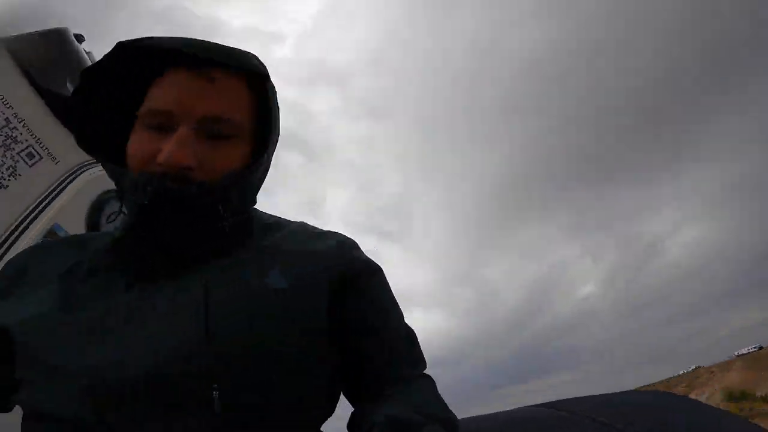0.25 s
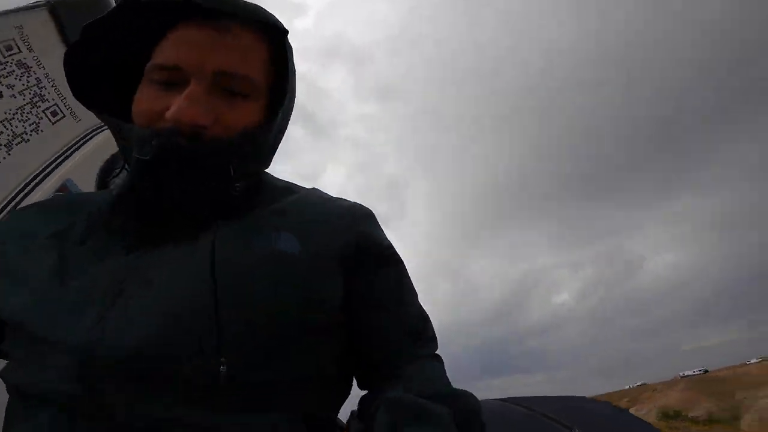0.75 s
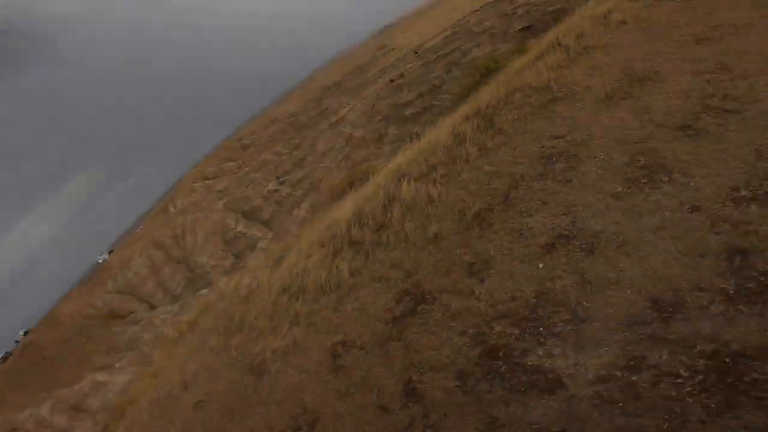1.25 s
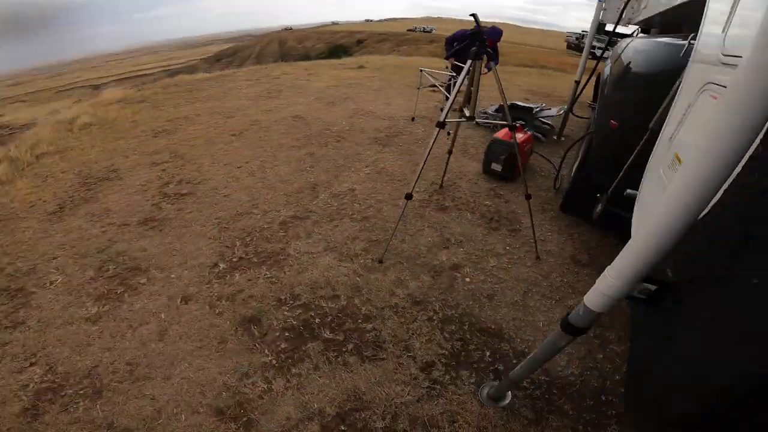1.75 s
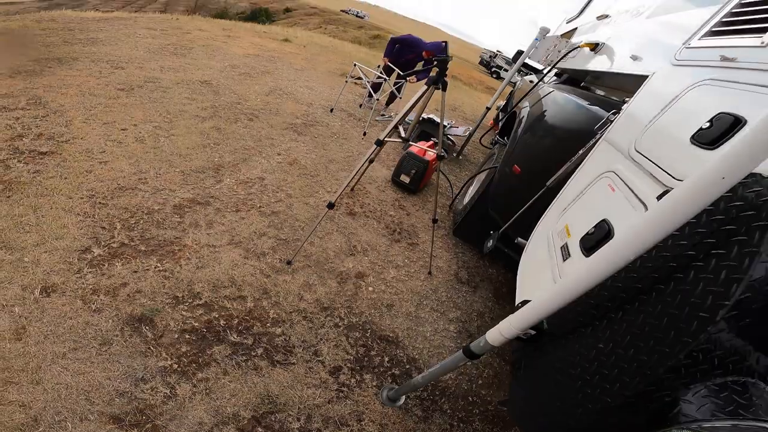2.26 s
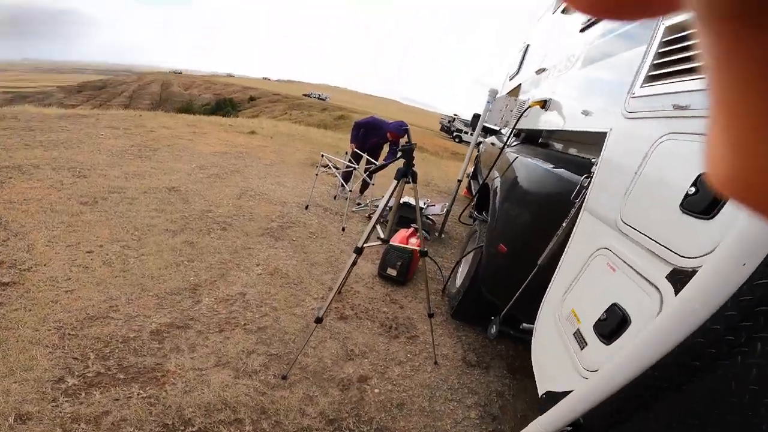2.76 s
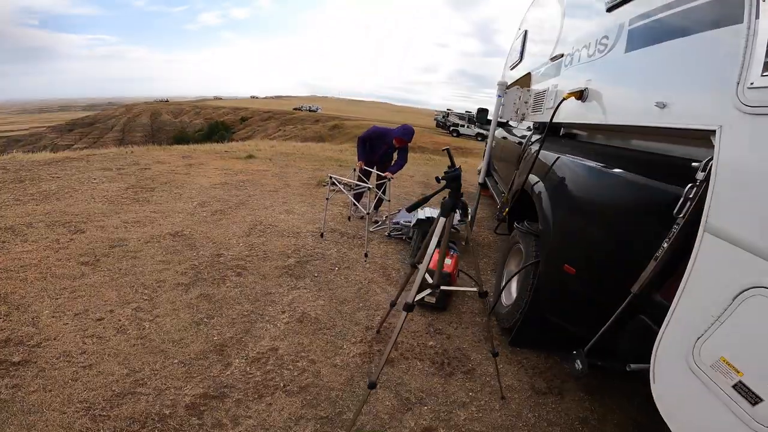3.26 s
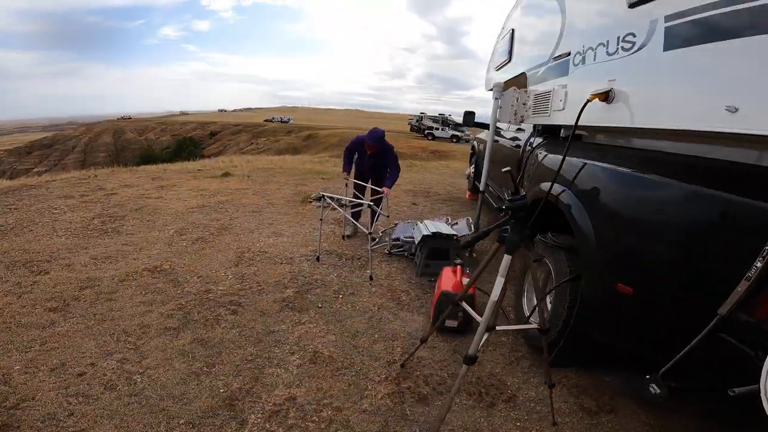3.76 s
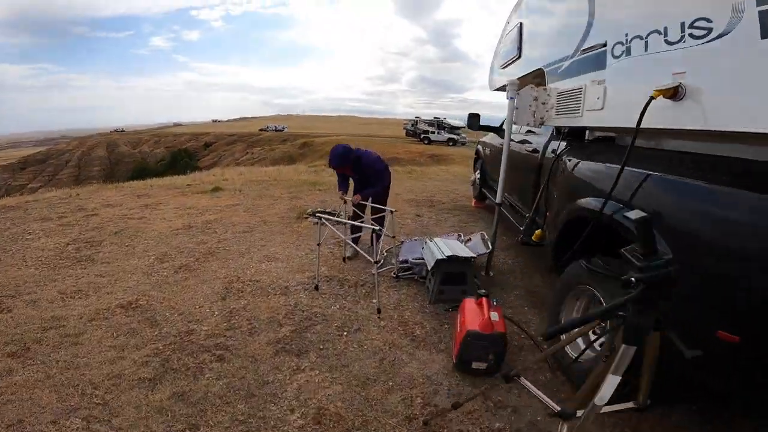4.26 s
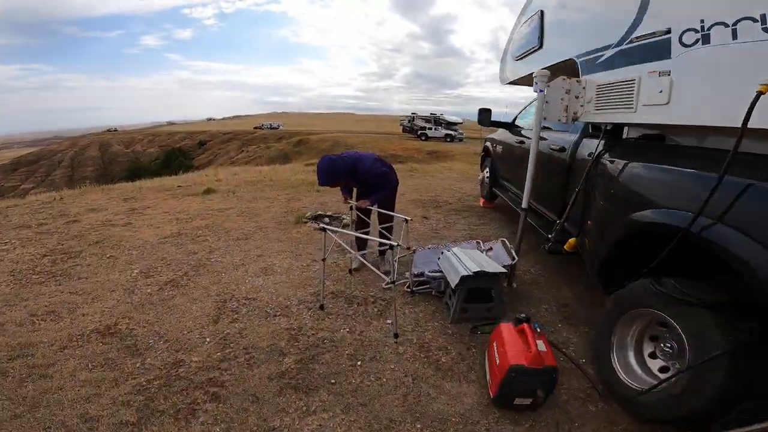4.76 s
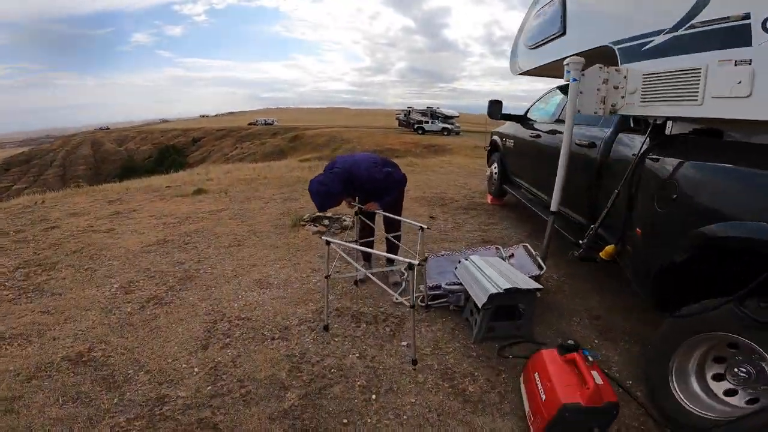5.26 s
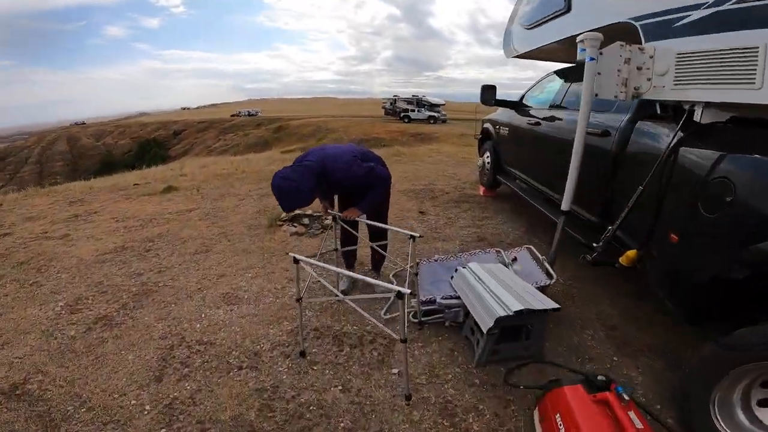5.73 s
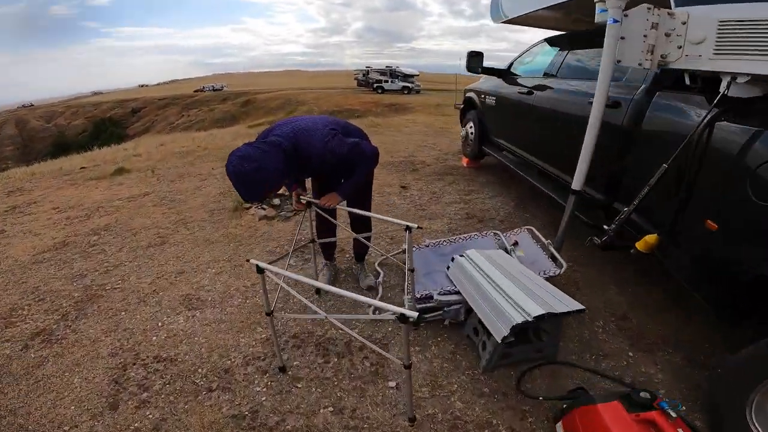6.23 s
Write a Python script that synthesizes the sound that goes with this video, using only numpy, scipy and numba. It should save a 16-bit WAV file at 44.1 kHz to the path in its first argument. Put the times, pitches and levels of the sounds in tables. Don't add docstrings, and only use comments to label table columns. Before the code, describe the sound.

Wind buffets and slaps a hand-held microphone on open grassland, then drops away as a small portable generator's rapid, rattling chug comes forward.

```python
import sys
import numpy as np
from scipy import signal
from scipy.fft import irfft
from scipy.io import wavfile
from scipy.ndimage import uniform_filter1d
from numba import njit

SR = 44100
rng = np.random.default_rng(int(sys.argv[2]) if len(sys.argv) > 2 else 0)


def file_out(sig):
    cols = np.atleast_2d(sig).T
    lim = np.clip(cols, -1, 1)
    pcm = np.round(lim * 32767).astype(np.int16)
    wavfile.write(sys.argv[1], SR, pcm)


def ratio_of_db(decibels):
    return 10 ** (np.asarray(decibels, float) / 20)


N = 286209

FIRING_HZ = 27.45
# t/s, nearness/dB, valve side facing/dB
APPROACH = [(0, -44, 0), (.45, -45, -2), (.75, -52, 1), (1.1, -52.5, 3), (1.45, -47, -2.5),
            (1.8, -41.5, 3.5), (2.2, -46.5, 0.5), (2.6, -44, -1), (3.05, -42.5, -2.5), (3.5, -41, 1.5),
            (3.9, -34.5, -2.5), (4.35, -38, -2), (4.65, -34, -6), (4.95, -29, -6.5), (5.4, -29.5, -6),
            (5.85, -28, -5.5), (6.15, -28, -6), (6.49, -27, -8)]
# t/s, lead/cycles
ARRIVAL_LEAD = [(0, 0.21), (.7, 0.2), (1.6, 0.2), (2.4, 0.18), (2.9, 0.19), (3.4, 0.14), (4.05, 0.17),
                (4.6, 0.095), (5.25, 0.1337), (5.85, 0.11), (6.3, 0.11), (6.49, 0.087)]
TAILPIPE_THUMPS = [
    (.18, .95),
    (.52, .8),
    (.8, .35),
]
# multiple of the firing rate, level/dB
MUFFLER_TONES = [(1, -62.5), (2, -54), (3, -44), (4, -30.5), (5, -8), (6, -10.5), (7, -4.5), (8, 1),
                 (9, 2.5), (10, -3.5), (11, -1), (12, -6), (13, -4.5), (14, -2.5), (15, -3), (16, -5),
                 (17, -22), (18, -5.5), (19, -13.5), (20, -31), (21, -8), (22, -18.5)]
# multiple of the firing rate, level/dB
PANEL_TONES = [(27, -11), (28, -10), (29, -7.5), (30, -10), (31, -10), (32, -10.5), (33, -1.5), (35, -9.5),
               (36, -9.5), (37, -8.5), (38, -5.5), (39, -5.5), (40, -10.5), (41, -4.5), (42, -19),
               (48, -11), (57, -19), (58, -12)]
# f/Hz, width/Hz, level/dB
CASING_MODES = [(442, 200, -19), (777, 110, -6.5), (925, 80, -1), (1072, 150, -1), (1373, 390, -6)]
# f/Hz, width/Hz, level/dB
PANEL_MODES = [(1597, 107, 0), (1820, 450, -9.5), (2303, 290, -7), (2458, 71, 0.5), (2700, 680, -5.5)]
# f/Hz, width/Hz, trim/dB
VALVE_MODES = [(3688, 210, -0.11), (4068, 130, -.1), (4386, 240, -.1), (4750, 220, -0.11),
               (5575, 200, -0.11), (6760, 320, -.1), (7470, 120, -.1)]
VALVE_LEVELS = [-14.5, -14.5, -21.5, -18, -24, -29.5, -30.5]
# t/s, half length/s, f/Hz, lift/dB
VALVE_BEAMS = [(.03, 0.16, 5500, 11), (0.39, 0.18, 4210, 16.5), (0.93, 0.21, 4070, 12),
               (1.434, 0.041, 4050, 13), (1.72, 0.12, 4200, 19.5), (1.78, 0.045, 4670, 16.5),
               (2.1, 0.047, 3900, 12), (2.11, 0.1, 4050, 9), (2.5, 0.04, 3000, 13), (3.17, 0.45, 4050, 11),
               (3.58, 0.42, 3600, 10), (3.8, 0.13, 4050, 10.5), (3.9, 0.024, 3820, 12),
               (4.55, 0.21, 4070, 10.5), (4.57, 0.43, 4600, 13.5), (2.8, 0.025, 4100, 7),
               (5.37, 0.058, 5630, 13.5), (6.5, 0.17, 4670, -24), (5.677, 0.091, 3840, 18.5),
               (6.4, 0.037, 4100, 5), (5.96, 0.065, 3650, 13.5), (6.314, 0.44, 4030, 13),
               (5.08, 0.25, 5530, 7.5), (4.9, 0.13, 3500, 4), (4.95, 0.23, 3800, 9.5),
               (2.54, 0.82, 5550, 9.5), (6.1, 0.13, 4000, 5), (0.33, 0.11, 5430, 14),
               (5.07, 0.16, 7500, 6.5), (4.1, .12, 7560, 12), (5.3, 0.1, 4470, 8), (5.7, .12, 7100, 4),
               (2.4, .12, 6700, 10), (3.05, .06, 4000, 5), (4.9, .15, 11000, 10), (5.72, 0.089, 7560, 4),
               (5.35, 0.22, 7560, 7.5), (3.4, 0.27, 6700, 13), (2.8, .08, 6100, 12),
               (3.58, 0.18, 5600, 6.5), (5.95, 0.13, 4050, 1.5), (6.9, 0.083, 4050, 5), (2.3, .15, 7360, 3),
               (6.25, 0.09, 5900, 8), (4.45, 0.18, 3700, 8), (4.78, .08, 4450, 8), (4.93, 0.044, 5100, 5.5),
               (4.6, .2, 5600, 10.5), (1.91, .06, 4700, 13), (4.76, .07, 4000, 7)]
# f/Hz, width/Hz, level/dB
FAN_SLOTS = [(3380, 560, 6.5), (4330, 1220, 10), (5510, 880, -1), (6770, 750, -3), (7580, 600, -5),
             (8490, 760, -10), (9320, 1000, -16), (10530, 1100, -22.5)]
# t/s, half length/s, f/Hz, lift/dB
LOBE_FLARES = [(.1, 0.22, 5850, 13), (1.299, 0.21, 1150, -4), (2.8, 0.19, 1540, 11.5),
               (2.7, 0.45, 7200, 8.5), (3.4, 0.26, 4300, 1.5), (3.53, 0.38, 2260, 10), (3.6, .25, 6000, 0),
               (4.3, 0.13, 4700, 0.5), (5.4, 0.46, 8000, 15), (1.6, .13, 1400, 11), (4.7, 0.17, 7500, 9),
               (6.3, .12, 1150, 2), (6.4, 0.2, 1040, 2.5), (6.28, 0.21, 6800, -3.5),
               (6.41, 0.36, 1330, -13), (1.1, 1.6, 7400, -5), (5.5, 0.65, 8000, -7.5),
               (2.1, .3, 6600, -0.5), (4.2, .25, 7400, -3.5), (2.3, 0.25, 1600, 5), (1.82, .1, 2600, 5.5),
               (3.4, 0.17, 950, 8), (2.9, .4, 5000, 4), (4.85, 0.32, 4350, 5), (5.4, 0.72, 1580, 3.5),
               (5.7, .2, 6200, 1), (5.4, .5, 10000, 4), (5.9, 0.18, 930, -1.5), (6.2, 0.27, 750, 2.5),
               (3.2, 0.22, 2250, -2), (4.1, .3, 9500, -5.5), (6.2, .35, 7500, 3.5), (4.75, .15, 6630, -5.5),
               (5.97, 0.12, 1030, 5), (4.7, 0.32, 400, -7.5), (6.2, 0.39, 400, 2), (6.2, 0.41, 260, -3),
               (.75, .02, 7500, -10), (6.4, .1, 560, 3), (.3, .4, 9000, -4), (1.4, .2, 750, -4),
               (4.3, 0.22, 830, 4.5), (4.9, .5, 10000, 2.5), (6.2, .4, 1100, -3.5), (5.3, .3, 560, -4.5),
               (6.2, .35, 1200, -2.5), (5.3, 0.13, 1400, -3.5)]
# t/s, length/s, buffet level/dB, brightness/dB
PORT_GUSTS = [(0.079, 0.089, -25, -14), (0.224, 0.16, -21, -14), (0.386, 0.15, -19, -15.5),
              (0.557, 0.13, -20, -29), (0.692, 0.087, -19.5, -17.5), (0.807, 0.042, -22.5, -17),
              (0.866, 0.033, -24, -12), (0.944, 0.11, -21.5, -19.5), (1.208, 0.024, -28, -10),
              (1.522, 0.023, -20, -16), (1.561, 0.053, -27, -16), (1.679, 0.2, -30.5, -8),
              (1.819, 0.085, -23, -26), (2.448, 0.036, -21.5, -5.5), (1.938, 0.17, -20, -15.5),
              (2.121, 0.069, -20.5, -12), (2.195, 0.012, -19, -8), (2.228, 0.26, -21, -17.5),
              (2.526, 0.054, -22, -11), (2.646, 0.086, -21.5, -12), (2.72, 0.28, -21, -6.5),
              (3.018, 0.08, -25.5, -19), (3.142, 0.15, -27.5, -40), (3.362, 0.21, -32.5, -25),
              (3.654, 0.1, -26.5, -10), (0.998, 0.021, -23, 0.5), (3.913, 0.12, -25, -19),
              (4.065, 0.068, -20.5, -7), (4.152, 0.061, -21.5, -15.5), (4.227, 0.079, -30.5, -7.5),
              (0, 0.042, -31, -26), (0.583, 0.012, -29, -7), (0.62, 0.012, -26, -13),
              (1.02, 0.032, -28.5, -13), (1.063, 0.038, -21.5, -12), (1.971, 0.032, -25.5, 0.5),
              (2.053, 0.011, -28, -8), (2.25, 0.015, -28, -3), (2.393, .05, -25.5, -9),
              (2.496, 0.022, -26.5, -2), (2.75, 0.038, -24, -1), (2.842, 0.016, -30, -11),
              (2.92, 0.031, -26, 1), (3.53, 0.047, -28, -17), (3.963, 0.053, -23, -5.5),
              (4.103, 0.027, -26.5, -9), (4.175, 0.016, -23, -2.5), (3.266, 0.07, -39, -23),
              (1.258, .012, -35, -16), (3.305, 0.023, -29, -22)]
# t/s, level/dB
LEE_STIR = [(4.4, -60), (4.7, -46), (4.9, -37.5), (5.15, -38.5), (5.35, -32.5), (5.5, -32.5), (5.7, -31),
            (5.86, -29), (5.95, -39), (6.25, -32), (6.49, -35)]
# f/Hz, width/Hz, level/dB
EDDY_MODES = [(168.4, 143, -14.5), (250, 105, -0.5), (359, 163, 1), (548, 274, -4), (770, 303, -9)]
# f/Hz, width/Hz, level/dB
RUSH_MODES = [(836, 437, 1.5), (1350, 940, -5.5), (2250, 1050, -10), (4180, 2300, -24.5)]
# t/s, peak level/dB, f/Hz, torn air/dB
SWING_SLAPS = [(0.02, -22, 527, -22), (0.044, -24, 598, -24), (0.068, -28, 250, -17),
               (0.098, -20, 277, -23), (0.171, -25, 409, -14), (0.248, -18.5, 315, -8),
               (0.279, -14.5, 395, -12), (0.329, -16, 543, -24), (0.358, -22, 398, -14),
               (0.384, -22, 232, -14), (0.426, -8, 487, -26), (0.479, -24, 394, -3), (0.537, -16, 320, -18),
               (0.603, -14, 401, -16.5), (0.631, -11, 417, -17), (0.686, -14.5, 490, -17),
               (0.712, -19, 255, -17), (0.819, -22, 460, -18), (0.885, -11.5, 517, -15.5),
               (0.94, -17.5, 519, -14.5), (0.962, -29, 353, -16), (0.98, -24, 447, -6),
               (0.994, -9, 670, -15.5), (1.06, -28, 290, -18), (1.098, -16.5, 312, -17),
               (1.143, -35, 216, -8), (1.366, -29, 207, -21), (1.522, -12, 382, -16), (1.595, -22, 272, -7),
               (1.746, -16, 320, -18)]
# t/s, peak level/dB, f/Hz, torn air/dB
STEP_SLAPS = [(1.91, -28, 315, -9), (1.924, -20, 248, -7.5), (1.956, -13, 361, -8),
              (1.981, -12.5, 320, -19), (2.016, -13, 390, -15), (2.079, -11, 475, -15.5),
              (2.136, -12.5, 272, -20), (2.246, -15, 331, -21), (2.262, -10.5, 524, -23),
              (2.273, -10, 347, -14), (2.321, -24, 304, -6.5), (2.41, -16, 270, -17),
              (2.468, -21, 310, -12), (2.533, -21, 323, -15), (2.629, -19.5, 342, -15),
              (2.642, -17, 284, -21), (2.678, -12, 730, -28), (2.705, -14, 463, -13.5),
              (2.736, -20, 280, -14), (2.777, -12, 344, -19), (2.843, -11, 546, -20),
              (3.047, -20, 339, -16), (3.178, -14.5, 420, -21), (3.217, -19, 220, -19),
              (3.369, -22, 297, -19), (3.548, -17.5, 470, -15), (3.586, -26, 427, -13),
              (3.658, -32, 304, -4), (3.677, -14, 350, -14), (3.988, -12, 424, -14), (4.069, -17, 374, -14),
              (4.175, -11, 470, -6.5), (4.256, -22, 326, -9)]
# t/s, peak level/dB, f/Hz, rush burst/dB
CASING_KNOCKS = [
    (5.162, -14, 1130, -25),
    (5.201, -10, 1130, -27),
    (5.274, -18, 1080, -25),
    (5.307, -11, 1150, -26),
    (6.08, -7, 1060, -20),
    (6.14, -12.5, 1020, -6),
]
# t/s, peak level/dB
MESH_TEARS = [(0.5945, -24), (0.6414, -35), (0.711, -33), (1.0765, -31), (1.9195, -29), (1.986, -22),
              (2.073, -21), (2.201, -26), (2.2717, -27), (2.2894, -30), (2.4683, -19), (2.504, -35),
              (2.645, -27), (2.8144, -28), (2.9753, -23), (3.9918, -17), (4.0816, -18.5), (4.1111, -20),
              (4.1805, -16.5), (4.2194, -25)]
# t/s, half length/s, level/dB
FLOW_STALLS = [(0.225, 0.0105, -6), (0.266, 0.006, -3), (0.319, 0.013, -4.5), (0.383, 0.014, -3.5),
               (0.471, 0.0051, -9), (0.547, 0.0068, -5), (0.628, 0.0046, -6), (0.657, 0.007, -3),
               (0.705, 0.0047, -8), (0.739, 0.016, -5.5), (0.8, 0.01, -2), (0.858, 0.0015, -6),
               (0.883, 0.015, -2.5), (0.934, 0.0132, -7), (0.949, 0.004, -3), (1.046, 0.0051, -1.5),
               (1.114, 0.0033, -4), (1.134, 0.0149, -5), (1.247, 0.0093, -8), (1.51, 0.0146, -5),
               (1.817, 0.0097, -3), (1.884, 0.0099, -11), (1.942, 0.0109, -2), (2.005, 0.0068, -8),
               (2.05, 0.0124, -0.5), (2.09, 0.0012, -5), (2.099, 0.0125, -6.5), (2.227, 0.013, -6.5),
               (2.238, 0.0023, 3), (2.297, 0.0048, -8), (2.335, 0.003, -10), (2.405, 0.0058, -6),
               (2.456, 0.0045, -2), (2.522, 0.0103, -4), (2.61, 0.0027, -8), (2.624, 0.004, -7),
               (2.638, 0.0029, -5), (2.698, 0.0063, -3), (2.765, 0.0036, -3.5), (2.825, 0.003, -6),
               (2.889, 0.0036, -8), (3.031, 0.0049, -4), (3.194, 0.0031, -7), (3.248, 0.0124, -8),
               (3.652, 0.014, -5), (3.903, 0.0107, -4), (3.96, 0.0063, -2), (4.008, 0.0027, -7),
               (4.04, 0.0045, -9), (4.048, 0.0098, -4), (4.167, 0.015, -2), (4.23, 0.0066, -6)]
# t/s, level/dB
STEADY_AIR = [
    (0, -36.5),
    (1.3, -38),
    (3.3, -35),
    (4.2, -35),
    (4.5, -45),
    (6.49, -43),
]
# f/Hz, width/Hz, level/dB
GRASS_MODES = [(72, 100, -3.5), (130, 225, -4.5), (250, 120, 5), (1150, 550, -12)]


def generator():
    near_db, facing_db = curves(APPROACH)
    turns = 2 + FIRING_HZ * np.arange(N) / SR + curves(ARRIVAL_LEAD)[0]
    flat_at_db = -25.5
    closer_db = near_db - flat_at_db
    tilt_db = 0.71 * np.maximum(closer_db, -10)
    shell_db = flat_at_db + 1.5 + 1.2762 * closer_db
    thump = ratio_of_db(near_db) * exhaust(turns, tilt_db)
    rattle = ratio_of_db(shell_db) * casing(turns, panel_db=4 + 0.65 * facing_db)
    chatter = ratio_of_db(near_db + facing_db) * (valves(turns) + ratio_of_db(-7) * fan(turns))
    return thump + rattle + chatter


def exhaust(turns, tilt_db):
    out = 0
    for k, db in MUFFLER_TONES:
        pulses = sum(size * np.exp(-2j * np.pi * k * at) for at, size in TAILPIPE_THUMPS)
        timing = np.angle(pulses)
        smear = .045 * (k - 9) ** 2
        level = ratio_of_db(db + tilt_db * np.log2(k / 7) + flare_db(k * FIRING_HZ) + 0.54 * walk(9.0))
        out = out + level * np.cos(2 * np.pi * k * turns + timing - smear + .05 * walk(12))
    return unit(out)


def casing(turns, panel_db):
    swell = gate(turns, .93, .1, -3.5, 1.8) + ratio_of_db(-5) * gate(turns, .6, .05, -40, 4.0)
    pattern = irfft(np.exp(2j * np.pi * rng.random(129)))
    clatter = np.interp(turns % 1, np.linspace(0, 1, len(pattern)), pattern)
    loose = body(noise() * swell, CASING_MODES, lobes=True)
    locked = body(clatter * np.sqrt(swell), CASING_MODES[1:], wander_db=1.5, lobes=True)
    panels = body(noise() * swell, PANEL_MODES, wander_db=2.14, lobes=True)
    return unit(loose + ratio_of_db(-3) * locked) + ratio_of_db(-3.5) * hum(turns) + ratio_of_db(panel_db - 4.5) * panels


def hum(turns):
    out = 0
    for k, db in PANEL_TONES:
        level = ratio_of_db(db + 1.6 * walk(5.7) + flare_db(k * FIRING_HZ))
        out = out + level * np.cos(2 * np.pi * (k * turns + rng.random()) + 0.12 * walk(8))
    return unit(out)


def valves(turns):
    out, t = 0, np.arange(N) / SR
    for db, mode in zip(VALVE_LEVELS, VALVE_MODES):
        ticks = noise() * gate(turns, .9, .11, -20, 1.4)
        beam_db = 0
        for s, half_s, hz, lift_db in VALVE_BEAMS:
            off_pitch = (hz - mode[0]) / 220
            beam_db = beam_db + lift_db * np.exp(-((t - s) / half_s) ** 2 - off_pitch ** 2)
        level = ratio_of_db(db + beam_db + .8 * walk(14))
        out = out + level * body(ticks, [mode], 1 + .006 * walk(30))
    return out


def fan(turns):
    out = 0
    for hz, width, db in FAN_SLOTS:
        rest_db = -2.5 + 0.45 * (hz / 1000 - 4)
        air = noise() * gate(turns, .91, 0.16, rest_db, 4.3)
        slot = body(air, [(hz, 1.67 * width, db)])
        slot = body(slot, [(hz, 1.55 * width, db)], 0.97, 1.4)
        out = out + ratio_of_db(db + flare_db(hz)) * np.sqrt(width) * slot
    return unit(out)


def gate(turns, at, width, rest_db, scatter_db):
    shifted = turns - at + .5
    strength = ratio_of_db(scatter_db * rng.standard_normal(400))[shifted.astype(int)]
    since = shifted % 1 - .5
    spread = np.where(since < 0, .55 * width, 1.4 * width)
    return ratio_of_db(rest_db) + strength * np.exp(-.5 * (since / spread) ** 2)


def flare_db(hz):
    t = np.arange(0, N, 64) / SR
    lift = 0
    for s, half_s, at_hz, db in LOBE_FLARES:
        off_pitch = np.log2(hz / at_hz) / 0.14
        lift = lift + db * np.exp(-((t - s) / half_s) ** 2 - off_pitch ** 2)
    return np.repeat(lift, 64)[:N]


def wind():
    buffet, bright = buffeting()
    ragged_db = 0.41 * walk(30) + 2.7 * walk(80) + 3.1 * walk(280)
    ragged_db = 4.5 * np.tanh(ragged_db / 4.5)
    low = evened(body(noise() * ratio_of_db(ragged_db), EDDY_MODES))
    rush = evened(body(noise() * ratio_of_db(1.3 * ragged_db + .8 * walk(40)), RUSH_MODES))
    chance, size = rng.random((2, N))
    snaps = (chance < 350 / SR) * ratio_of_db(-3.5 * np.log(size + .04)) * np.sign(noise())
    crackle = ratio_of_db(-6) * body(snaps, RUSH_MODES)
    thuds = ratio_of_db(-8) * body(snaps * (chance < 110 / SR), EDDY_MODES)
    bright_air = lowpass(2, 4530, rush + crackle)
    out = ratio_of_db(-2.0) * (buffet * low + bright * bright_air) + buffet * thuds
    out = out * hush()
    add_slaps(out, rush)
    add_tears(out, rush)
    return lowpass(4, 7500, out)


def buffeting():
    t = np.arange(N) / SR
    stir = (t > LEE_STIR[0][0]) * ratio_of_db(curves(LEE_STIR)[0] + 0.55 * walk(4.02))
    lull = ratio_of_db(-40 + curves(STEADY_AIR)[0] - STEADY_AIR[2][1])
    low = lull + stir
    rush = lull * ratio_of_db(-10.5) + stir * ratio_of_db(-10)
    for s, length_s, db, bright_db in PORT_GUSTS:
        sag_db = 0.5 * np.clip((t - s) / length_s - .5, -1, 1)
        gust = ratio_of_db(db + sag_db) * swell_of(s, length_s, attack_s=0.015, release_s=0.023)
        low = np.hypot(low, gust)
        rush = np.hypot(rush, gust * ratio_of_db(bright_db))
    return low, rush


def swell_of(start_s, length_s, attack_s, release_s):
    t = np.arange(N) / SR - start_s
    return np.clip(t / attack_s, 0, 1) * np.exp(-np.maximum(t - length_s, 0) / release_s)


def evened(x):
    power = uniform_filter1d(x ** 2, int(.014 * SR))
    return unit(x / (power + .01) ** (.8 / 2))


def hush():
    dip = np.zeros(N)
    ramp = np.linspace(0, 1, int(0.0061 * SR)) ** .5
    for s, *_ in SWING_SLAPS + STEP_SLAPS:
        i = int(s * SR)
        dip[i - len(ramp):i] = ramp
    t = np.arange(0, N, 16) / SR
    stall_db = sum(db * np.exp(-((t - s) / half_s) ** 2) for s, half_s, db in FLOW_STALLS)
    return ratio_of_db(-9 * uniform_filter1d(dip, size=40) + np.repeat(stall_db, 16)[:N])


def add_slaps(out, rush):
    t = np.arange(2000) / SR
    torn_shape = np.minimum(t / 0.00067, 1) * np.exp(-t / 0.0058)
    for s, peak_db, hz, torn_db in SWING_SLAPS + STEP_SLAPS + CASING_KNOCKS:
        i = int(s * SR)
        edge = (1 - np.exp(-t / 0.00031)) ** 2
        ring = np.sin(2 * np.pi * hz * t) * edge * np.exp(-t * hz / 1.58)
        out[i:i + len(t)] += ratio_of_db(peak_db + 2.5) * ring
        out[i:i + len(t)] += ratio_of_db(peak_db + torn_db) * rush[i:i + len(t)] * torn_shape


def add_tears(out, rush):
    t = np.arange(2000) / SR
    tear_s = 0.0017
    shape = (t / tear_s) * np.exp(1 - t / tear_s)
    for s, peak_db in MESH_TEARS:
        i = int(s * SR)
        out[i:i + len(t)] += ratio_of_db(peak_db - 5) * rush[i:i + len(t)] * shape


def grass():
    return ratio_of_db(curves(STEADY_AIR)[0] + 1.0 * walk(1.6)) * body(noise(), GRASS_MODES)


def body(x, modes, drift=0.98, wander_db=0., lobes=False):
    out = 0
    for n, (hz, width, db) in enumerate(modes):
        g = np.tan(np.pi * hz * drift / SR) * np.ones(N)
        k = 1.52 * width / hz
        level = ratio_of_db(db + wander_db * walk(4) + lobes * flare_db(hz))
        out = out + (-1) ** n * level * svf(svf(x, g, k), g, k)
    return unit(out)


@njit
def svf(x, g, k):
    y, b, l = np.empty(len(x)), 0., 0.
    for i in range(len(x)):
        v = (b + g[i] * (x[i] - l)) / (1 + g[i] * (g[i] + k))
        b = 2 * v - b
        l = l + 2 * g[i] * v
        y[i] = k * v
    return y


def lowpass(order, hz, x):
    return signal.sosfilt(signal.butter(order, hz, fs=SR, output="sos"), x)


def walk(rate):
    k = int(SR / rate)
    held = np.repeat(rng.standard_normal(N // k + 1), k)
    return unit(uniform_filter1d(uniform_filter1d(held, k), k // 2)[:N])


def noise():
    return rng.standard_normal(N)


def curves(rows):
    s, *columns = np.transpose(rows)
    return [np.interp(np.arange(N) / SR, s, c) for c in columns]


def unit(x):
    return x / np.sqrt(np.mean(x ** 2))


def scene():
    return (generator() + wind() + grass())[None]


def low_pass(x):
    return signal.sosfilt(signal.butter(12, 12300, fs=SR, output="sos"), x)


def record(dry):
    x = np.tanh(2.2 * dry) / 2.2
    x = signal.sosfilt(signal.butter(4, 105, "high", fs=SR, output="sos"), x)
    x = lowpass(5, 9800, x)
    return low_pass(x)


dry = scene()
out = record(dry)
file_out(out)
```